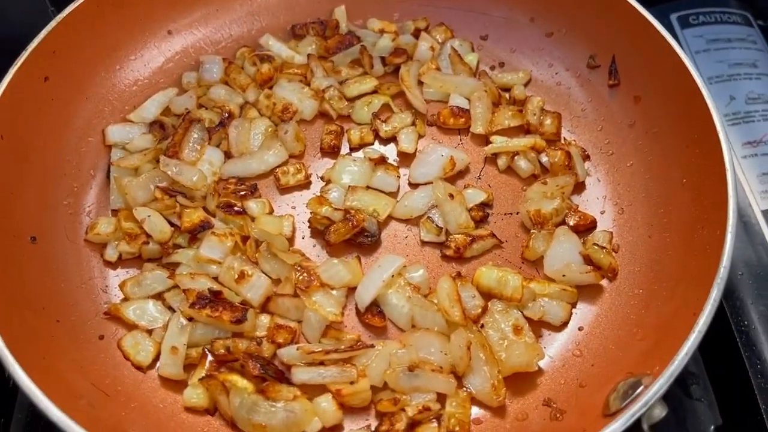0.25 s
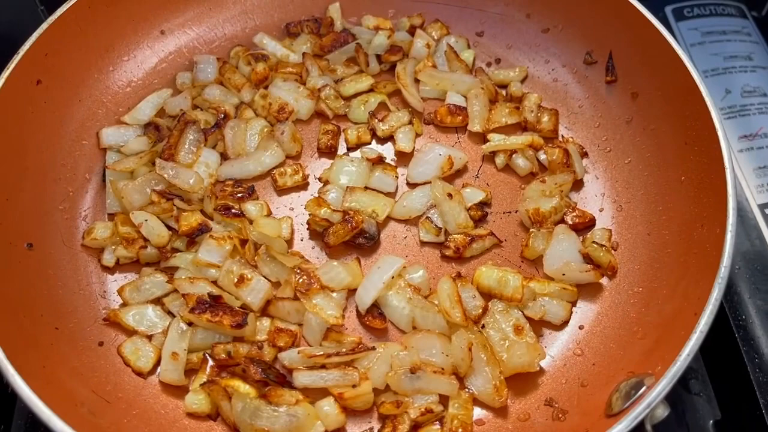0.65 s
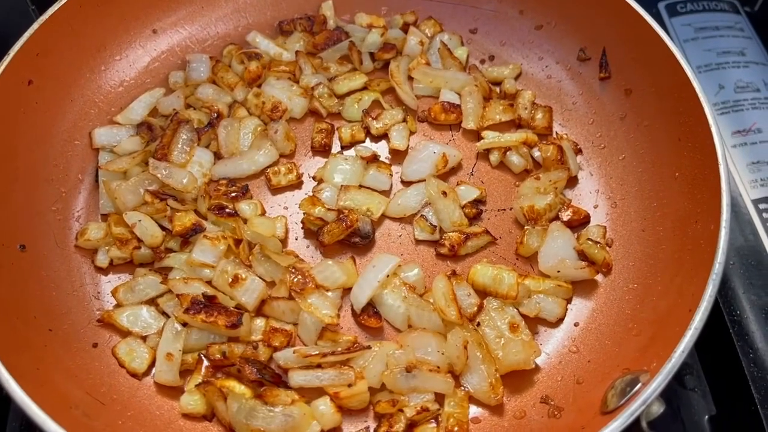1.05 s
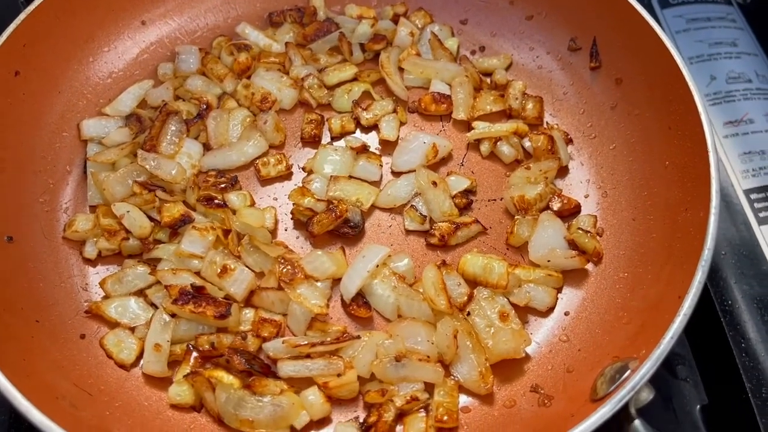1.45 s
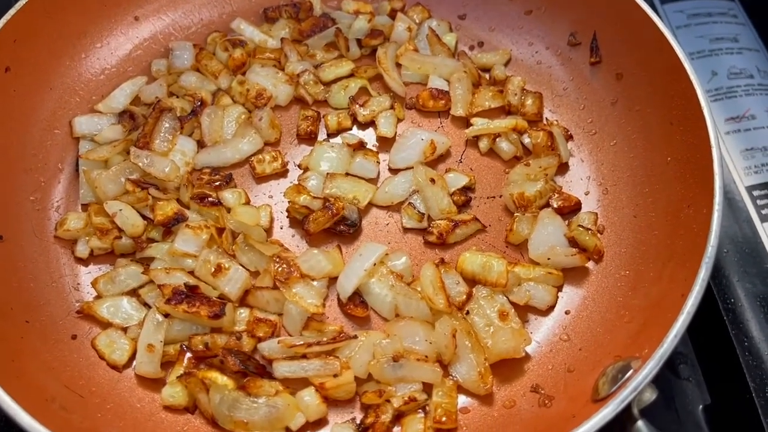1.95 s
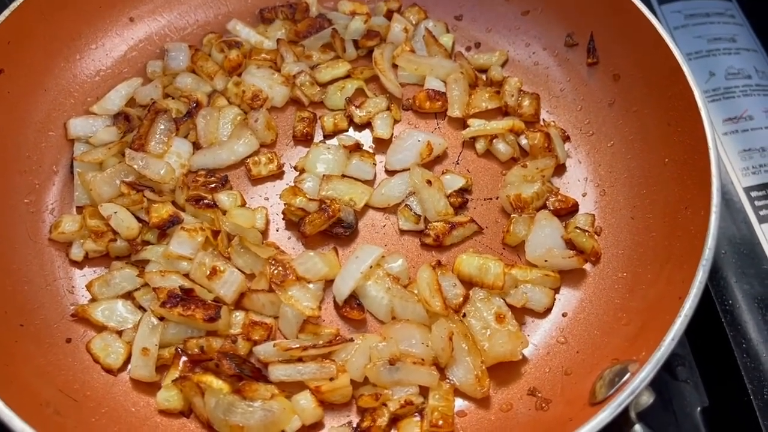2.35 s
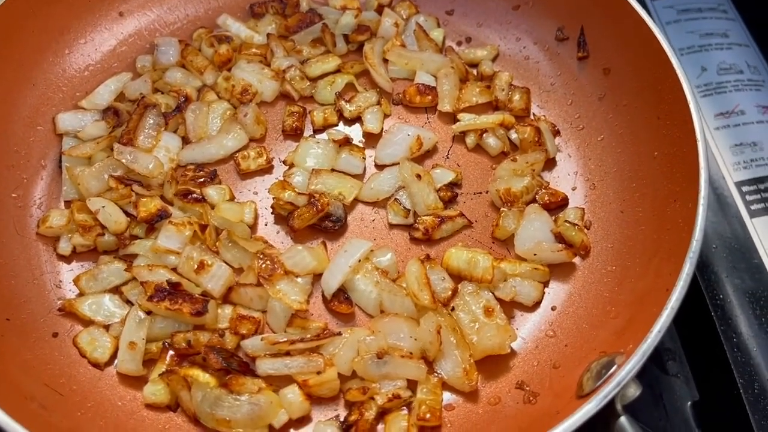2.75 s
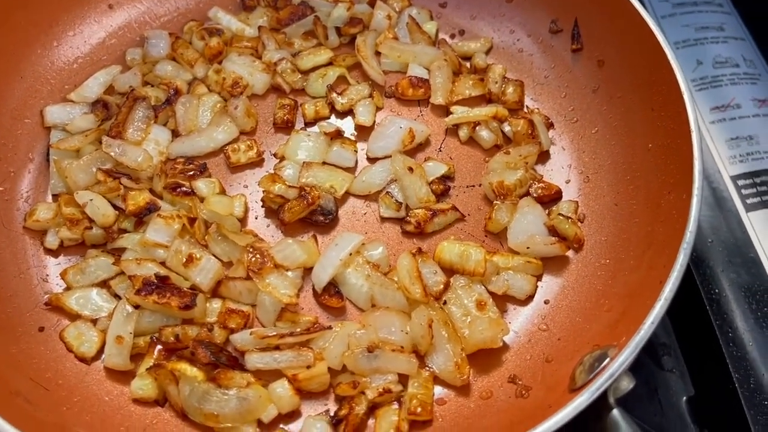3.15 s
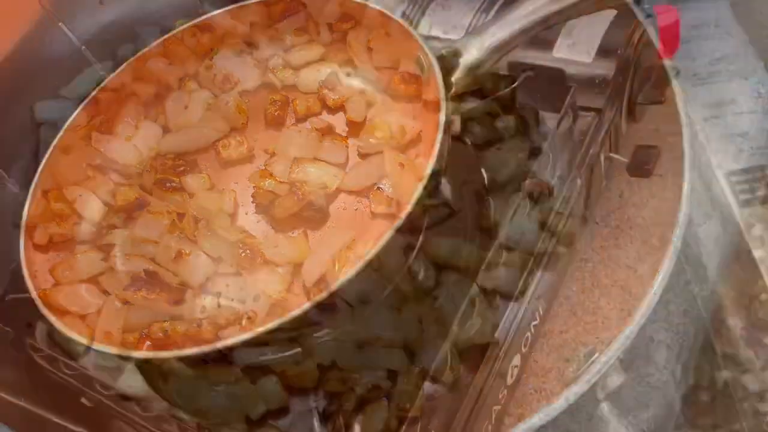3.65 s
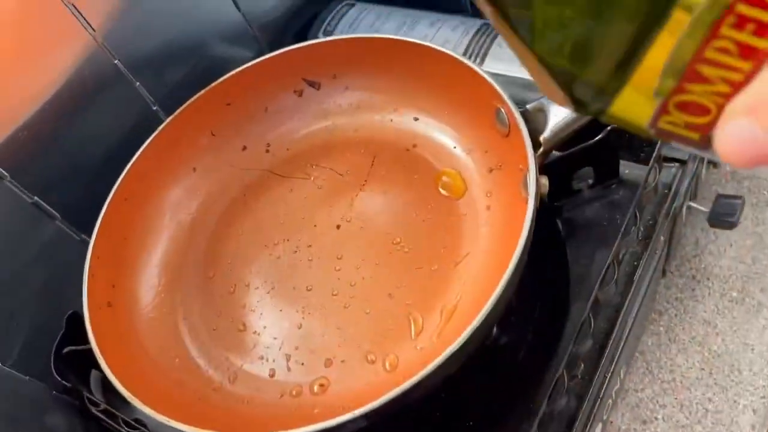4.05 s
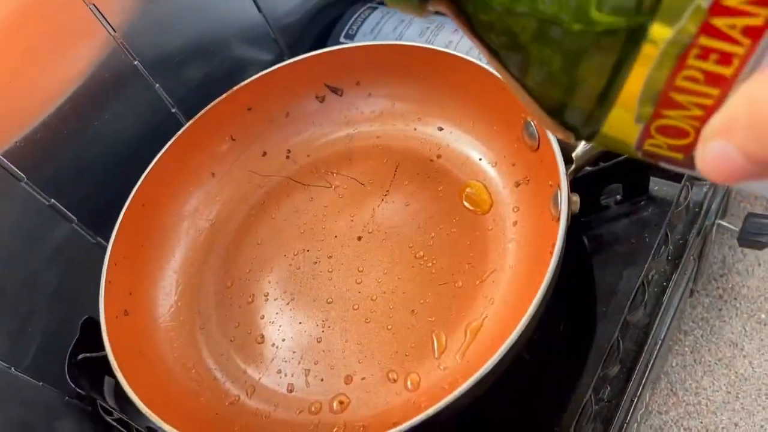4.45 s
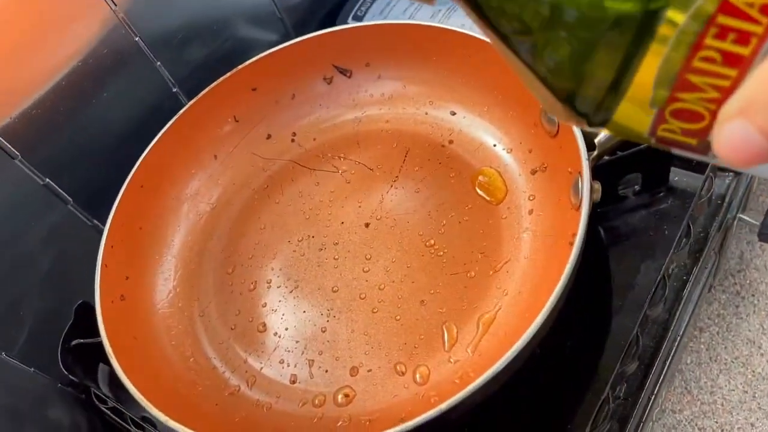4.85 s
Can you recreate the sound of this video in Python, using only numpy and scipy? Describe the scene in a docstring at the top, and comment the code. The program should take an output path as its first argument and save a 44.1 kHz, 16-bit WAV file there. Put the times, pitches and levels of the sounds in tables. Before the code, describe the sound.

Diced onions sizzle and crackle brightly in an oiled pan, then fade quickly at a cut to faint burner hiss and bottle knocks.

```python
"""Outdoors, at a camp stove: diced onions fry in oil in a shallow pan until the sizzle is faded out at a cut.
Bubbles are random bursts that ring, plink or burst dully; droplets snap and crack; the pan's modes colour both.
The gas burner is then heard without the pan: a rumbling flame and a hissing jet, both shaped noise.
An oil bottle clunks and knocks in damped modes, and the shifting grip rustles; a faint hum swells earlier."""
import sys
import numpy as np
from scipy import signal
from scipy.fft import rfft, irfft, next_fast_len
from scipy.io import wavfile

SR = 44100
rng = np.random.default_rng(int(sys.argv[2]) if len(sys.argv) > 2 else 0)


def store_wav(level_fs):
    """Save 16-bit WAV to argv[1]."""
    pcm = np.round(np.clip(np.atleast_2d(level_fs), -1, 1) * 32767)
    wavfile.write(sys.argv[1], SR, pcm.T.astype(np.int16))


N = 225615
TIME = np.arange(N) / SR
SIZE = 2 * next_fast_len(N // 2 + 4096)  # transform length, padded for the filter tails
HZ = np.maximum(np.arange(SIZE // 2 + 1) * SR / SIZE, 1)


def from_db(db):
    """Logarithmic level: decibels become an amplitude gain."""
    return 10 ** (np.asarray(db) / 20)


def rms_one(x):
    """Power normalisation: the mean square becomes 1."""
    return x / np.sqrt(np.mean(x ** 2) + 1e-20)


def over_hz(points):
    """Logarithmic frequency scale: a table is joined up at every frequency."""
    hz, value = np.transpose(points)
    return np.interp(np.log(HZ), np.log(hz), value)


def colour(x, spectrum, keep_power=True):
    """Minimum-phase filtering: a folded cepstrum gives a causal filter with the given spectrum."""
    gain = from_db(over_hz(spectrum))
    if keep_power:
        gain = rms_one(gain)
    cepstrum = irfft(np.log(gain))
    cepstrum[1:SIZE // 2] *= 2
    cepstrum[SIZE // 2 + 1:] = 0
    response = np.exp(rfft(cepstrum))
    return irfft(rfft(x, SIZE) * response)[..., :N]


def drift(rate):
    """Slow random modulation: chance values, rate per second, joined by lines and scaled to spread 1."""
    knots = rng.standard_normal(4096)
    return rms_one(np.interp(TIME * rate, np.arange(len(knots)), knots))


def swell(peak_s, rise_db_per_s, fall_db_per_s):
    """Exponential growth and decay: a gain climbs to 1 and falls, each at a steady rate in dB."""
    before = np.maximum(peak_s - TIME, 0)
    after = np.maximum(TIME - peak_s, 0)
    return from_db(-rise_db_per_s * before - fall_db_per_s * after)


def bump(s, half_s):
    """Gaussian envelope: a smooth rise and fall of height 1."""
    return np.exp(-((TIME - s) / half_s) ** 2)


def resonate(x, hz, width):
    """Forced resonance: a two-pole band filter with gain 1 at its peak."""
    r = np.exp(-np.pi * width / SR)
    zeros = np.array([1, 0, -1]) * (1 - r * r) / 2
    poles = [1, -2 * r * np.cos(2 * np.pi * hz / SR), r * r]
    return signal.lfilter(zeros, poles, x + 1e-18)


def ring(x, hz, width):
    """Free vibration: a unit click sets a mode ringing at height 1."""
    return resonate(x, hz, width) * SR / (2 * np.pi * width)


def clicks_at(times, sizes):
    """Impulse excitation: one click at each time."""
    samples = np.round(np.asarray(times) * SR).astype(int)
    return np.bincount(samples, sizes, N)[:N]


def grains(per_s, spread_db):
    """Random impulse process: clicks at chance moments, many small and few large."""
    loudness_db = spread_db * np.minimum(rng.exponential(1, N), 5.5)
    sizes = from_db(loudness_db) * rng.choice([-1, 1], N)
    return rms_one(sizes * (rng.random(N) < per_s / SR))


def splash(clicks, decay_s):
    """Exponential energy decay: each click becomes a dying puff of noise with the same energy."""
    r = np.exp(-1 / (decay_s * SR))
    energy = signal.lfilter([1 - r], [1, -r], clicks ** 2 + 1e-18)
    return np.sqrt(energy) * rng.standard_normal(N)


def chime(bursts, low_hz, high_hz, sharpness):
    """Resonator bank: each burst rings briefly at one of 24 pitches dealt by chance."""
    pitches = np.geomspace(low_hz, high_hz, num=24)
    dealt = rng.integers(0, len(pitches), N)
    return sum(resonate(bursts * (dealt == k), hz, hz / sharpness) for k, hz in enumerate(pitches))


def stereo(mid, side):
    """Sum and difference: left and right from mid and side."""
    return np.array([mid + side, mid - side])


def add(out, sound, s):
    """Superposition: a short sound is mixed in at a given time."""
    start = round(s * SR)
    out[:, start:start + sound.shape[1]] += sound


HUM_HZ, HUM_WANDER_HZ = 148.8, 3.2
# it swells slowly and fades quickly
HUM_DB, HUM_PEAK_S, HUM_RISE_DB_PER_S, HUM_FALL_DB_PER_S = -49, 1.98, 8, 122


def hum():
    """Frequency modulation: a faint low tone in the surroundings wavers in pitch and level."""
    pitch_hz = HUM_HZ + HUM_WANDER_HZ * drift(9)
    tone = np.sqrt(2) * np.sin(2 * np.pi * np.cumsum(pitch_hz) / SR)
    level = from_db(HUM_DB + 2.3 * drift(4.9))
    return tone * level * swell(HUM_PEAK_S, HUM_RISE_DB_PER_S, HUM_FALL_DB_PER_S)


# Colour of the flame's rumble. Each row: frequency in Hz, relative density in dB per Hz.
FLAME_COLOUR = [(13, -55), (22, -45), (44, -2), (70, 4.5), (123, -6.5), (153, -5), (177, -12.5), (265, -14),
                (400, -25.5), (520, -52), (880, -120)]
FLAME_DB, FLAME_WAVER_DB, FLAME_WAVER_PER_S = -44, 1.6, 4.83
FLAME_SWELL_S, FLAME_SWELL_HALF_S, FLAME_SWELL_DB = 4.6, 0.87, 2  # the rumble swells once


def flame():
    """Combustion noise: burning gas rumbles low and lumpily, nearly the same at both ports."""
    mid, side = rng.standard_normal((2, N))
    rumble = colour(stereo(mid, from_db(-21.5) * side), FLAME_COLOUR)
    drone = from_db(-30.0) * rms_one(resonate(resonate(mid, 80, 17), 80, 17))
    level_db = FLAME_DB + FLAME_SWELL_DB * bump(FLAME_SWELL_S, FLAME_SWELL_HALF_S)
    waver_db = FLAME_WAVER_DB * drift(FLAME_WAVER_PER_S)
    return (0.87 * rumble + drone) * from_db(level_db - waver_db)


# Colour of the gas hiss. Each row: frequency in Hz, relative density in dB per Hz.
GAS_COLOUR = [(200, -3), (550, 10), (900, 9.5), (1110, 9), (1450, -0.5), (1850, 5.5), (2150, -2.5),
              (2430, 4), (2800, -15), (3500, -7.5), (5000, 4.5), (6000, -4.5), (7000, 3.5), (8000, -24),
              (8900, 8.5), (10500, -8), (11400, 2), (12300, -33), (13000, -25), (14000, -50)]
# Width of the hiss between the ports. Each row: frequency in Hz, side relative to mid in dB.
HISS_WIDTH = [(300, -0.5), (1500, -5), (3000, -33), (4400, -57), (5200, -3), (9000, 3.5), (12000, 5.5)]
# Resonances of the burner. Each row: frequency in Hz, width in Hz, relative strength in dB.
BURNER_MODES = [(3074, 115, 6.5), (3790, 65, -4), (4190, 120, -5), (4980, 33, -3.5), (5150, 35, -3),
                (5500, 45, -1.5), (5860, 90, -2.5), (7150, 130, -12), (9276, 34, -2), (11900, 83, -16)]
# the hiss fades in across the cut as the sizzle fades out, then holds
GAS_DB, GAS_FULL_S, GAS_RISE_DB_PER_S = -47.5, 3.75, 45
WHISTLE_WAVER_DB, WHISTLE_WAVER_PER_S = 2, 14


def gas():
    """Jet noise: the gas hisses and excites a faint, wavering whistle in the burner's resonances."""
    mid, side = rng.standard_normal((2, N))
    jet = stereo(mid, colour(side, HISS_WIDTH, keep_power=False))
    whistle = np.zeros((2, N))
    for hz, width, db in BURNER_MODES:
        strength = from_db(db + WHISTLE_WAVER_DB * drift(WHISTLE_WAVER_PER_S))
        whistle += strength * resonate(jet, hz, width)
    hiss = rms_one(colour(jet + from_db(16.5) * whistle, GAS_COLOUR))
    return hiss * from_db(GAS_DB) * swell(GAS_FULL_S, GAS_RISE_DB_PER_S, 0)


# Colour of the rustle. Each row: frequency in Hz, relative density in dB per Hz.
RUSTLE_COLOUR = [(250, 12), (700, 12), (1000, 12), (2000, 10.5), (3500, 4), (6500, 0), (9000, -24),
                 (13000, -52)]
# The hand shifts its grip. Each row: centre in seconds, half length in seconds, gain in dB.
GRIP_SHIFTS = [(4.11, 0.17, -50), (4.802, 0.038, -53)]


def hand():
    """Friction noise: a shifting grip rubs in fine grains."""
    rub = grains(per_s=700, spread_db=2.6)
    mid = splash(rub, decay_s=0.0012)
    side = 0.28 * splash(rub, decay_s=0.002)
    grip = sum(from_db(db) * bump(s, half) for s, half, db in GRIP_SHIFTS)
    return colour(stereo(mid, side), RUSTLE_COLOUR) * grip


# Knocks, rattles and ticks of the handled bottle. Each row: start in seconds, thud drive in dB,
# frequency that the contact excites most in Hz, scrape drive in dB, hard tick drive in dB.
CONTACTS = [(3.788, -32.5, 800, -40, -44), (3.793, -28, 1550, -42, -34), (3.808, -29, 1290, -27, -27),
            (3.815, -11, 635, -41, -24), (3.82, -20, 1300, -56, -16), (3.827, -21, 1100, -58, -30),
            (3.829, -19, 646, -58, -21), (3.831, -22.5, 240, -60, -46), (3.841, -30, 240, -60, -46),
            (3.848, -27, 905, -53, -46), (3.853, -30, 1260, -52, -46), (3.868, -35, 1150, -58, -46),
            (3.878, -49, 1300, -57, -48), (3.893, -32, 1190, -58, -44), (3.903, -45, 1100, -55, -30),
            (3.919, -41, 720, -61, -22), (3.929, -35, 1250, -61, -26), (3.954, -45, 1700, -47.5, -21.5),
            (4.021, -37.5, 1200, -57, -36), (4.033, -54, 1900, -67, -29), (4.05, -42, 1100, -64.5, -34),
            (4.088, -43, 1440, -49, -21), (4.103, -45, 1300, -57, -29), (4.141, -44, 1900, -52, -24),
            (4.175, -53, 1780, -63, -23), (4.193, -47, 1120, -52, -24), (4.213, -43, 1090, -48, -19),
            (4.262, -30, 970, -45.5, -15.5), (4.268, -41, 1070, -61, -23), (4.679, -46, 800, -49, -42),
            (4.685, -38, 1120, -61, -31), (4.689, -38, 1150, -57, -22), (4.709, -32, 1120, -57, -33),
            (4.716, -40, 1120, -60, -34), (4.751, -46, 980, -54, -38), (4.762, -48, 1080, -52, -34)]
# Damped modes of the bottle. Each row: frequency in Hz, width in Hz, relative strength in dB.
BOTTLE_MODES = [(236, 100, 4.5), (544, 55, -2), (685, 96, 1), (726, 38, -10), (966, 53, -3.5),
                (1120, 58, -5.5), (1365, 68, -5), (1700, 110, -13)]
# Colour of a hard tick. Each row: frequency in Hz, relative density in dB per Hz.
TICK_COLOUR = [(400, -7), (1000, -5), (2200, 7.5), (3800, -2), (6000, -2), (10000, -59)]
# Colour of a scraping contact. Each row: frequency in Hz, relative density in dB per Hz.
SCRAPE_COLOUR = [(120, 3.5), (260, -6), (390, -6), (500, 8.5), (750, 5.5), (1200, 0), (1750, 2.5),
                 (2300, -8), (3800, -15), (4600, -17), (7500, -12.5), (11000, -11), (13000, -46)]
CONTACT_WIDTH, SCRAPE_RISE_S = 0.16, 0.0067  # width of the excited band is a share of its centre
THUMP_HZ, THUMP_WIDTH_HZ, THUMP_DB = 178, 220, -9  # low push of a knock; drive relative to its thud's


def bottle():
    """Modal excitation: each contact thuds in damped modes (a soft one in the low), thumps, ticks, scrapes."""
    start_s, thud_db, centre_hz, scrape_db, tick_db = np.transpose(CONTACTS)
    blows = np.zeros(N)
    for s, db, hz in zip(start_s, thud_db, centre_hz):
        blows += resonate(clicks_at([s], [from_db(db)]), hz, CONTACT_WIDTH * hz)
    thud = sum(from_db(db) * ring(blows, hz, width) for hz, width, db in BOTTLE_MODES)
    push = resonate(clicks_at(start_s, from_db(thud_db + THUMP_DB)), THUMP_HZ, 2 * THUMP_HZ)
    thump = ring(push, THUMP_HZ, THUMP_WIDTH_HZ)
    tick = colour(splash(clicks_at(start_s, from_db(tick_db)), decay_s=0.0009), TICK_COLOUR)
    knock = thud + thump + tick
    # each scrape rises to its peak after SCRAPE_RISE_S, then dies
    age = np.maximum(TIME - start_s[:, None], 0) / SCRAPE_RISE_S
    contact = from_db(scrape_db) @ (age * np.exp(1 - np.minimum(age, 50)))
    mid, side = rng.standard_normal((2, N))
    scrape = colour(contact * stereo(mid, 0.4 * side), SCRAPE_COLOUR)
    return stereo(knock, 0.14 * knock) + scrape


SWELL_S = 0.00051  # a droplet swells before it bursts


def snap(energy_db, hz):
    """Cavity resonance: a droplet fizzes as it swells, then rings a few cycles, rising, with a ragged tail."""
    t = TIME[:256]
    ring_s, fizz_s, rise_hz_per_s = 0.00018, 0.0006, 2.5e6
    age = np.clip(t - SWELL_S, 0, 0.002)
    cycles = (hz + rise_hz_per_s * (age / 2 - 1.5 * ring_s)) * age
    tone = np.sin(2 * np.pi * cycles) * (age / ring_s) * np.exp(-age / ring_s)
    band = signal.butter(2, [0.78 * hz, 1.2 * hz], "band", fs=SR, output="sos")
    grit = signal.sosfilt(band, rng.standard_normal((2, len(t))))
    fizz = 0.42 * stereo(grit[0], 0.7 * grit[1]) * (t / fizz_s) * np.exp(-t / fizz_s)
    lean_db = rng.normal(0, 1.2) * np.array([[1], [-1]])  # louder at one port than at the other
    shape = (tone + fizz) * from_db(lean_db)
    return from_db(energy_db) * shape / np.sqrt(np.sum(shape ** 2) / 2)


SPRAY_S, CRACK_RING_DB = 0.0016, 8.5  # energy decay of the spray; strength of the resonance


def crack(level_db, hz):
    """Impact and resonance: a slap and a puff of spray ring broadly at the droplet's own pitch."""
    t = TIME[:400]
    spray = rng.standard_normal((2, len(t))) * np.exp(-t / (2 * SPRAY_S)) / np.sqrt(SPRAY_S * SR)
    slap = stereo(0.6 * (t == 0) + 0.7 * spray[0], 0.4 * spray[1])
    return from_db(level_db) * (slap + from_db(CRACK_RING_DB) * resonate(slap, hz, hz / 2))


# the frying eases slowly, then a cut fades it out, to silence over the last STOP_S
FRYING_DB, EASE_DB_PER_S = -27, 0.21  # drive of the bubbles
FADE_START_S, FADE_DB_PER_S, STOP_S, FRYING_END_S = 3.474, 40.5, 0.12, 3.8
# before the gains in droplets()
SMALL_POPS_PER_S, SMALL_SNAP_DB, SMALL_CRACK_DB, SMALL_SPREAD_DB = 6, -19, -39, 1.5


def small_pops():
    """Random point process: small droplets pop by chance before the fade; rows like those of the timed ones."""
    count = round(SMALL_POPS_PER_S * FADE_START_S)
    start_s = rng.random(count) * FADE_START_S
    size_db = rng.standard_normal(count) * SMALL_SPREAD_DB
    snap_hz = rng.uniform(9300, 11500, count)
    crack_hz = rng.uniform(2000, 7500, count)
    return np.transpose([start_s, SMALL_SNAP_DB + size_db, snap_hz, SMALL_CRACK_DB + size_db, crack_hz])


# Droplets that pop at set times, loud and faint. Each row: start in seconds, snap level in dB before
# SNAP_GAIN_DB, snap pitch in Hz, dull crack level in dB before CRACK_GAIN_DB, crack pitch in Hz.
TIMED_POPS = [(0.099, -8, 10900, -38, 6040), (0.1227, -25, 10300, -28, 4300),
              (0.2762, -18, 10500, -51, 7000), (0.283, -10, 11300, -49, 6960),
              (0.3403, -5.5, 10800, -39, 2000), (0.4296, -10.5, 9650, -38, 6500),
              (0.434, -9, 9900, -32, 2500), (0.5203, -27, 9700, -31, 5500),
              (0.6056, -18, 10800, -30.5, 4500), (0.6714, -3.5, 10300, -47, 7000),
              (0.6919, -19, 10500, -41, 7000), (0.7117, -1, 10300, -21, 4650),
              (0.714, -6, 11400, -26, 2000), (0.724, -16, 11100, -48, 7000),
              (0.7645, -14, 11300, -50, 7000), (0.7745, -11, 11000, -42, 7000),
              (0.7768, -5, 10500, -25.5, 7000), (0.8024, -24, 10500, -48, 7000),
              (0.9133, -12, 9700, -42, 7500), (0.9545, -8, 10800, -42, 7000),
              (0.974, -7.5, 10600, -52, 7000), (1.0236, -5, 10800, -21.5, 4340),
              (1.038, -21, 11000, -39, 3000), (1.2288, -7, 10900, -48, 7000), (1.596, -18, 9400, -32, 6500),
              (1.6002, -21, 9300, -27.5, 6500), (1.6044, -15, 9500, -27, 6500),
              (1.6338, -13, 10200, -25.5, 7000), (1.75, -28, 9500, -35, 6500),
              (2.052, -9, 9600, -26.5, 6500), (2.0936, -16, 10000, -38, 6000),
              (2.1255, -16, 11300, -32, 4600), (2.181, -5.5, 10600, -45, 7500),
              (2.3122, -8, 10100, -36, 2000), (2.3945, -16, 11400, -36, 6500),
              (2.4214, -4.5, 10800, -26, 3520), (2.4377, -7, 10600, -27.5, 5000),
              (2.459, -2, 10600, -28.5, 2000), (2.4683, -11, 10300, -32, 6500),
              (2.477, -7, 10600, -48, 7000), (2.716, -4, 10100, -49, 7500), (2.7428, -12, 10400, -50, 7000),
              (2.8003, -1.5, 10500, -26.5, 4170), (2.8044, -9.5, 10600, -48, 7000),
              (3.0525, -21, 9300, -34, 7000), (3.118, -14, 11000, -48, 7000),
              (3.204, -6.5, 10460, -32, 6500), (3.2317, -16, 10500, -48, 7000),
              (3.2435, -9, 10200, -40, 2500), (3.278, -18, 9400, -38, 2500),
              (3.4665, -13.5, 11200, -48, 7000), (3.5458, -29, 9400, -28, 4000)]
# Colour of a droplet's crack. Each row: frequency in Hz, relative density in dB per Hz.
CRACK_COLOUR = [(200, 3), (900, -3.5), (1800, 3), (5500, 3), (8000, 15), (12000, 15), (16000, -65)]
SNAP_GAIN_DB, CRACK_GAIN_DB = 13, 21.5


def droplets():
    """Vapour explosion: a droplet bursts in a sharp snap and slaps the pan with a duller crack, faint or strong."""
    snaps, cracks = np.zeros((2, 2, N))
    for s, snap_db, snap_hz, crack_db, crack_hz in np.vstack([TIMED_POPS, small_pops()]):
        add(snaps, snap(snap_db + SNAP_GAIN_DB, snap_hz), s)
        add(cracks, crack(crack_db + CRACK_GAIN_DB, crack_hz), s + SWELL_S)
    return snaps + colour(cracks, CRACK_COLOUR)


# Wet pieces that let off steam. Each row: centre in seconds, half length in seconds, rise in activity in dB.
STEAM_SPURTS = [(0.269, 0.016, 4), (1.602, 0.012, 4), (1.638, 0.014, 7.5), (2.065, 0.037, 3.5),
                (2.528, 0.093, 3), (3.569, 0.013, 3.5)]
# Larger, duller bubbles under the onions. Each row: frequency in Hz, relative density in dB per Hz.
SIMMER_COLOUR = [(200, 0), (420, -7.5), (620, 0), (950, -5), (1250, -4), (1800, -6), (2200, -6.5),
                 (4000, -0.5), (6500, -0.5), (9000, -15.5)]
# middling bubbles in the oil: rate, level relative to the bubble drive, lowest and highest pitch
PLINKS_PER_S, PLINK_DB, PLINK_LOW_HZ, PLINK_HIGH_HZ = 650, -20, 1900, 6500


def bubbles():
    """Clustered random bursts: steam bubbles burst or ring, middling ones plink, big ones burst dully."""
    spurt = from_db(sum(db * bump(s, half) for s, half, db in STEAM_SPURTS))
    clumps = from_db(0.7 * drift(110) + 0.5 * drift(25) + 0.4 * drift(9.8))
    activity = spurt * clumps
    fade = swell(FADE_START_S, 0, FADE_DB_PER_S) * np.clip((FRYING_END_S - TIME) / STOP_S, 0, 1)
    strength = from_db(FRYING_DB - EASE_DB_PER_S * TIME) * fade
    # activity makes the bursts both denser and louder
    bursts = grains(per_s=10000 * activity, spread_db=3.3) * np.sqrt(activity) * strength
    rings = from_db(14.0) * chime(bursts, low_hz=4500, high_hz=12850, sharpness=150)
    near = []  # plinks nearer to each port
    for port in (0, 1):
        pops = grains(PLINKS_PER_S / 2, spread_db=2)
        near.append(rms_one(chime(pops, PLINK_LOW_HZ, PLINK_HIGH_HZ, sharpness=24)))
    plinks = np.array([near[0] + 0.25 * near[1], near[1] + 0.25 * near[0]]) * strength
    big = grains(per_s=3600, spread_db=1.5) * strength
    dull = stereo(splash(big, decay_s=0.0017), 0.5 * splash(big, decay_s=0.0015))
    simmer = from_db(-14.5) * colour(dull, SIMMER_COLOUR)
    return bursts, rings, simmer + from_db(PLINK_DB) * plinks


# Colour of the bursting bubbles. Each row: frequency in Hz, relative density in dB per Hz.
SIZZLE_COLOUR = [(150, -19), (420, -27.5), (600, -19), (950, -25), (2200, -23.5), (3500, -19),
                 (6000, -16.5), (7500, -9), (9200, -2), (11400, 2), (12500, -3.5), (13600, -16),
                 (15600, -23), (16500, -12)]
# Stereo width of the sizzle: its side part. Each row: frequency in Hz, filter gain in dB.
SIZZLE_WIDTH = [(400, -11), (1500, -8), (2500, -4.5), (5800, -4), (8000, -7), (9000, -15), (9800, -10),
                (10700, -21), (11600, -12), (12500, -20), (13400, -8), (15500, -13)]
# Resonances of the pan. Each row: frequency in Hz, width in Hz, gain in dB.
PAN_MODES = [(580, 110, -14), (796, 70, -5.5), (1010, 32, -0.5), (1215, 202, 3.5), (1767, 85, 8.5),
             (2490, 105, -7)]
# Phase between the two microphone ports. Each row: frequency in Hz, lead of the left in radians.
PORT_LEAD = [(100, 0), (2200, 0), (2900, -1), (3600, -.3), (7000, -.4), (7900, -1.3), (9100, .1),
             (10000, 2), (10800, 3.2), (12200, 6.2), (13100, 6.4), (13700, 9.4), (14700, 9.5),
             (15300, 12.5)]


def frying():
    """Modal resonance: the pan's modes colour the bubbles and droplets, which are heard at two ports."""
    bursts, rings, simmer = bubbles()
    short_spray = 0.6 * splash(bursts, decay_s=0.0004)
    long_spray = 0.35 * splash(bursts, decay_s=0.003)
    mid = 0.7 * bursts + short_spray + long_spray + rings
    side = colour(splash(bursts, decay_s=0.002), SIZZLE_WIDTH, keep_power=False)
    sound = colour(stereo(mid, side), SIZZLE_COLOUR) + simmer + droplets()
    pan = sum(from_db(db) * resonate(sound, hz, width) for hz, width, db in PAN_MODES)
    left, right = sound + pan
    right = irfft(rfft(right, SIZE) * np.exp(-1j * over_hz(PORT_LEAD)))[:N]
    # the right port is a little louder in the middle range: (Hz, dB)
    balance = [(600, -0.5), (1500, 1.7), (7000, 1.7), (10000, 0.1)]
    return np.array([left, colour(right, balance, keep_power=False)])


def scene():
    """Superposition: pan, stove and bottle are summed in the open air."""
    return hum() + flame() + gas() + hand() + bottle() + frying()


CUTOFF_HZ = 16500


def record(dry):
    """Overload and band limiting: peaks beyond full scale are clipped and the top is cut."""
    low_pass = signal.cheby2(16, 60, CUTOFF_HZ, fs=SR, output="sos")
    return signal.sosfilt(low_pass, np.clip(dry, -1, 1))


dry = scene()
out = record(dry)
store_wav(out)
```